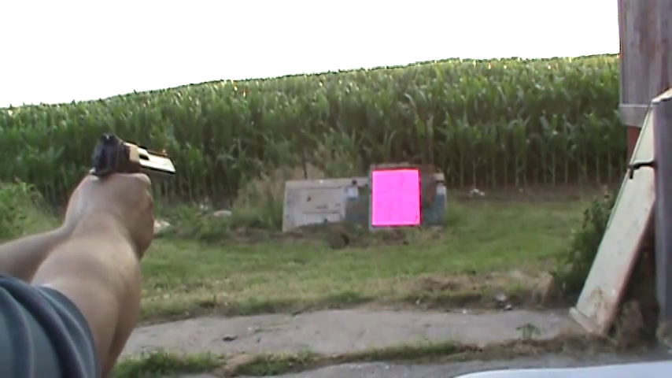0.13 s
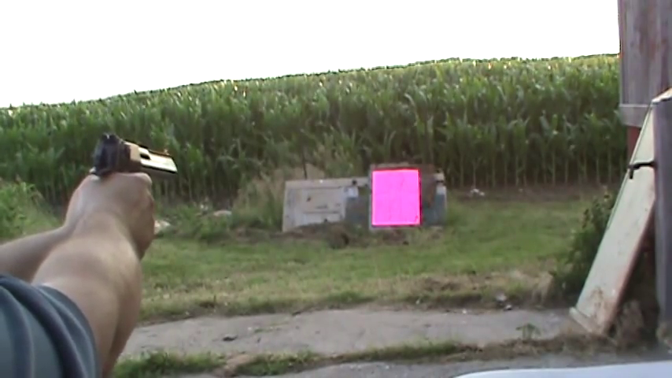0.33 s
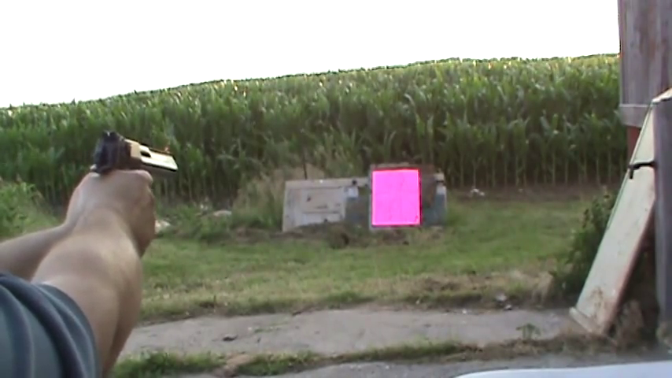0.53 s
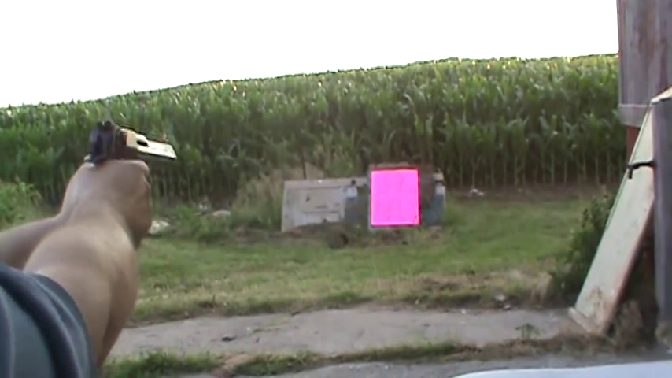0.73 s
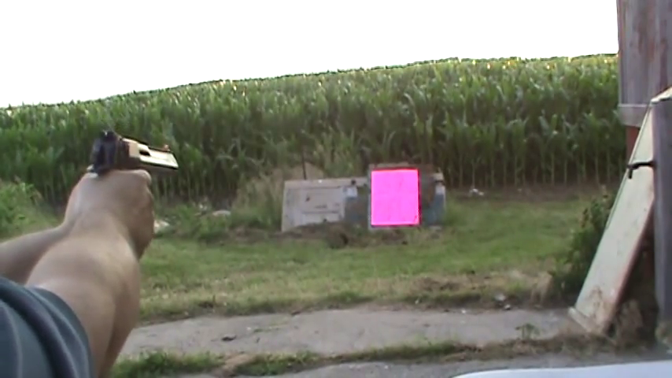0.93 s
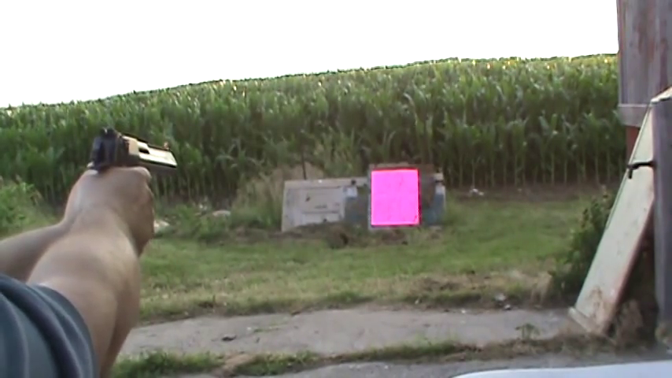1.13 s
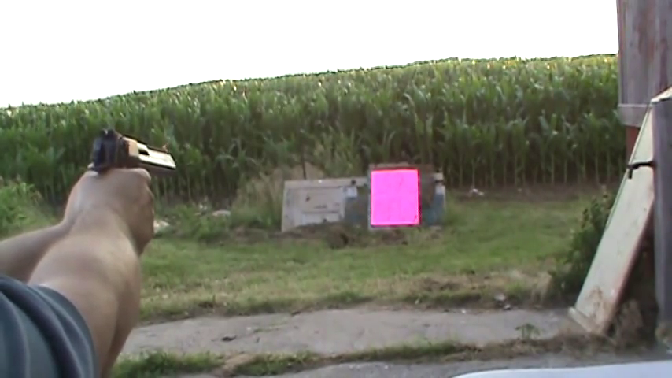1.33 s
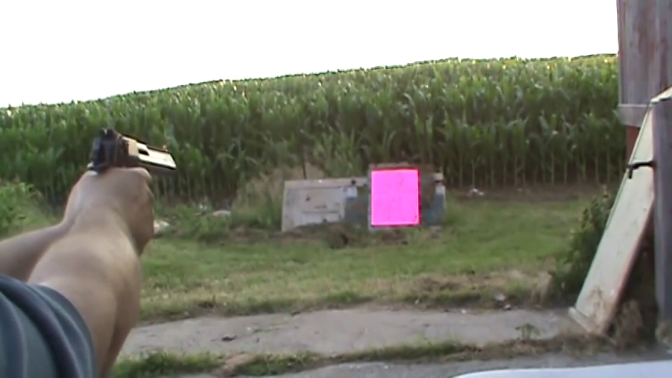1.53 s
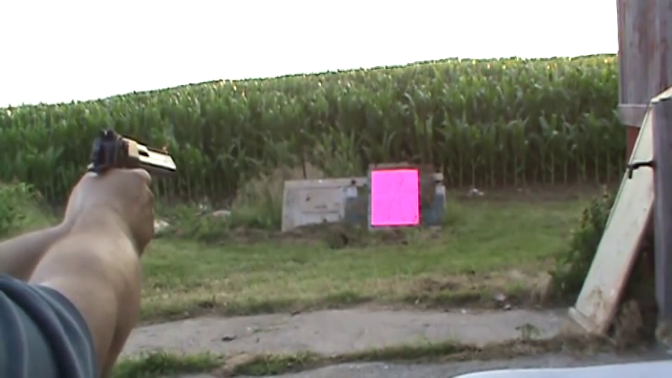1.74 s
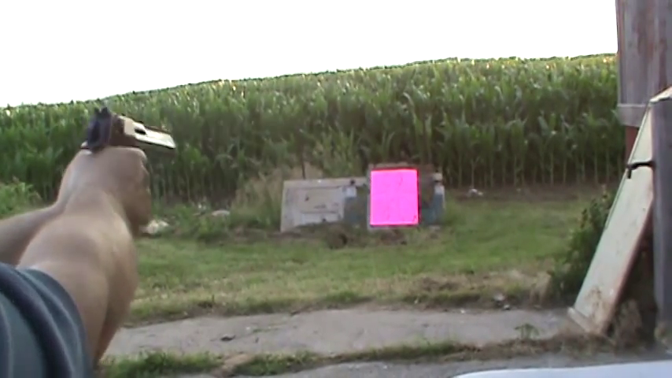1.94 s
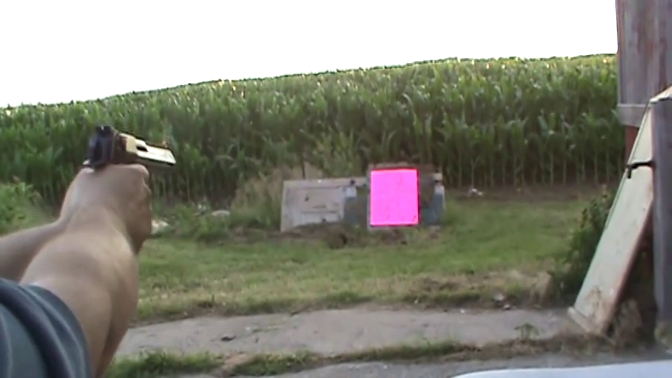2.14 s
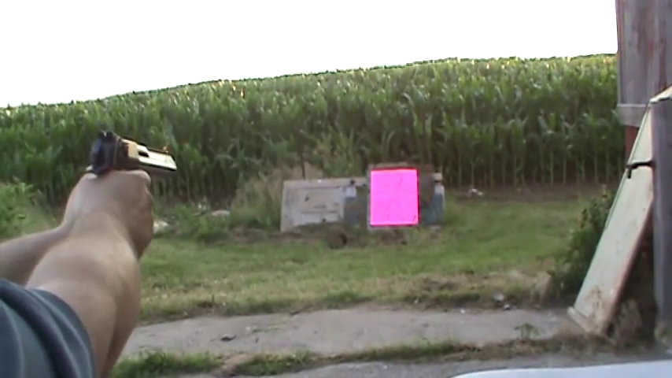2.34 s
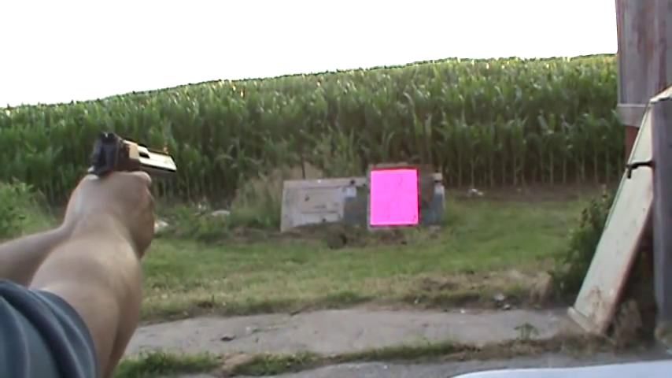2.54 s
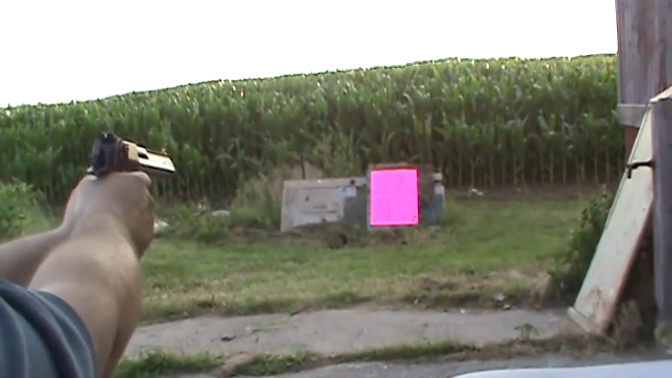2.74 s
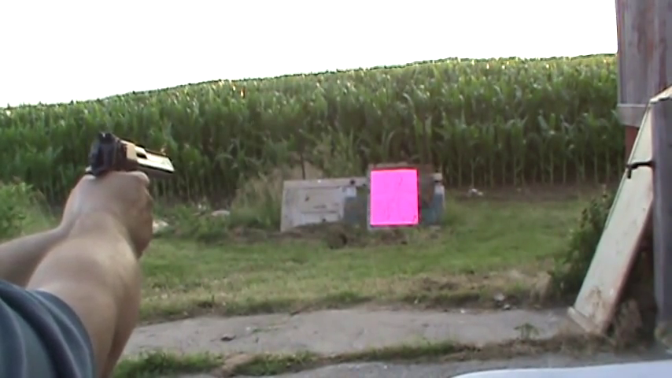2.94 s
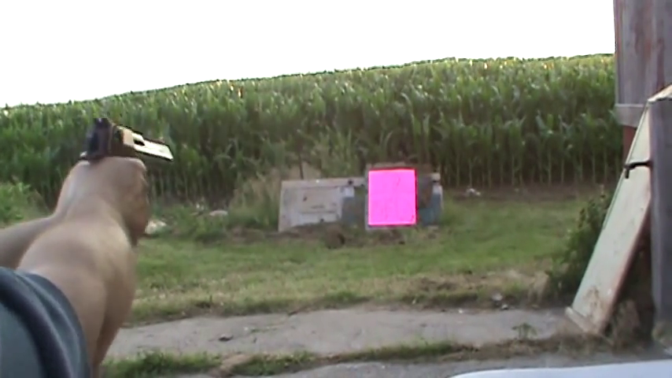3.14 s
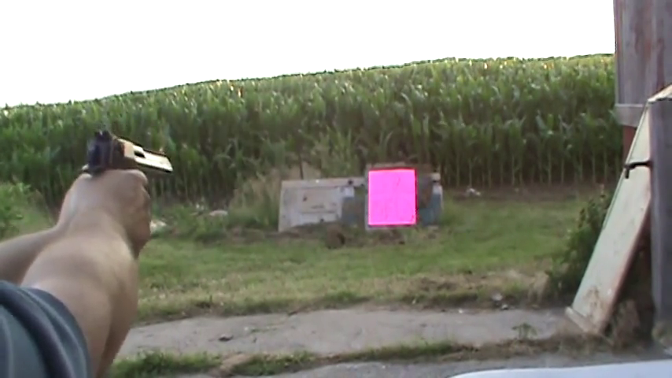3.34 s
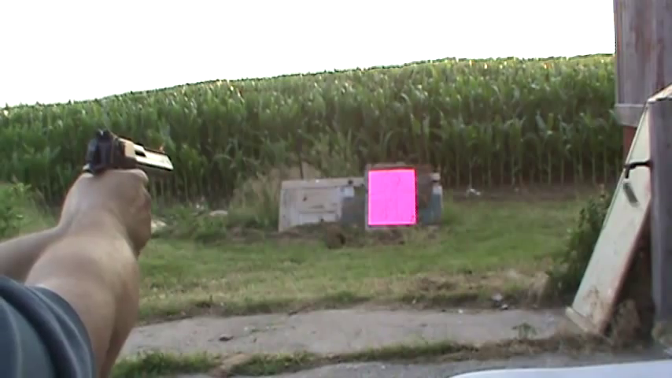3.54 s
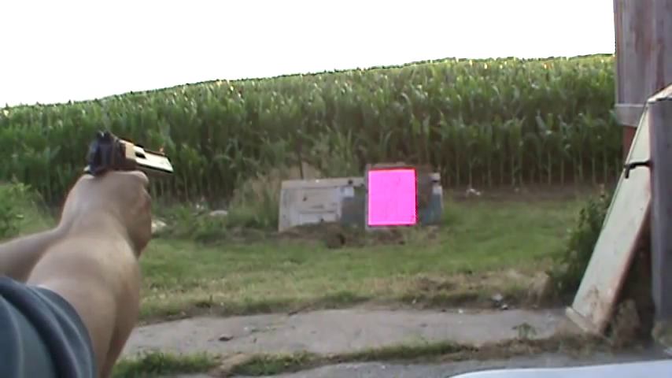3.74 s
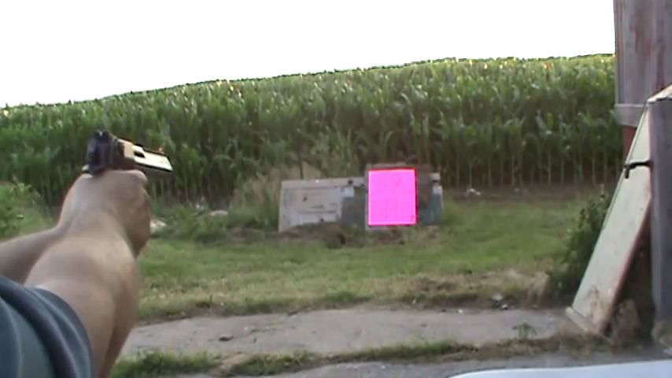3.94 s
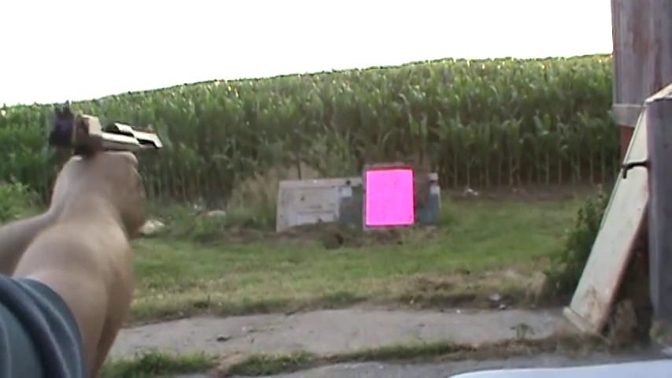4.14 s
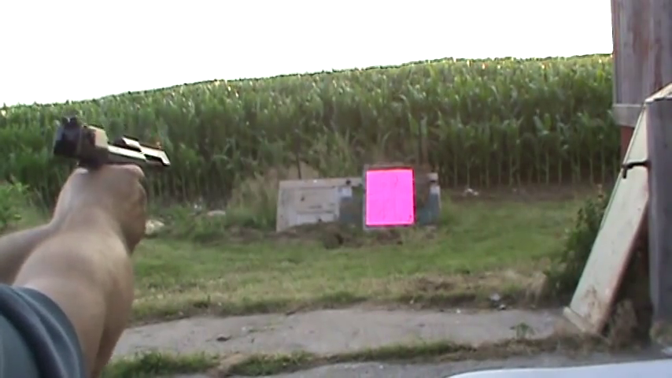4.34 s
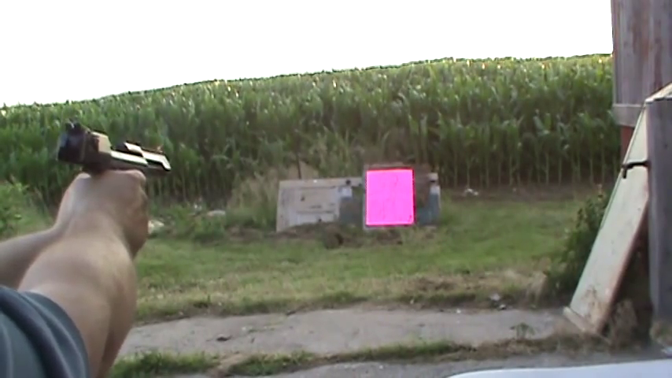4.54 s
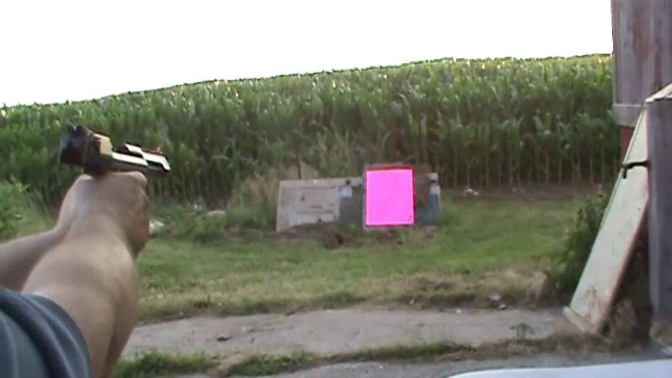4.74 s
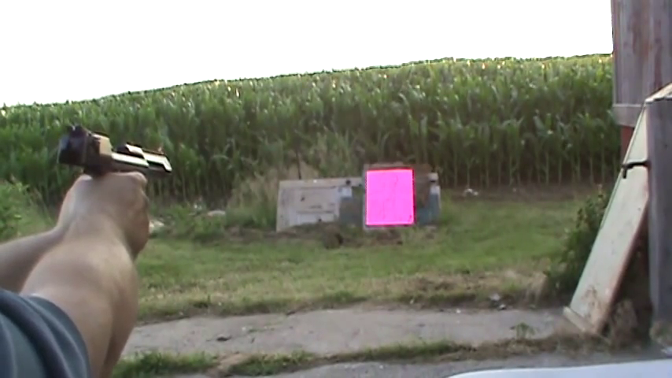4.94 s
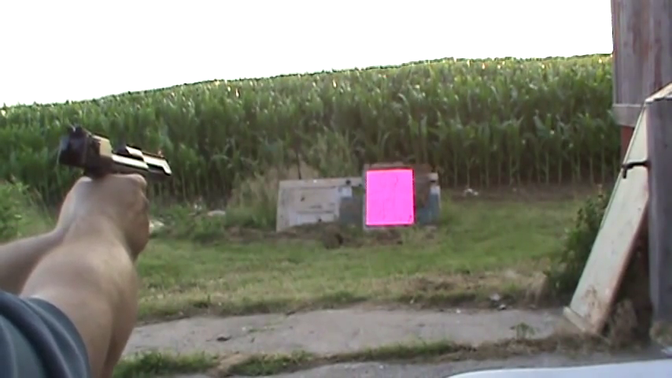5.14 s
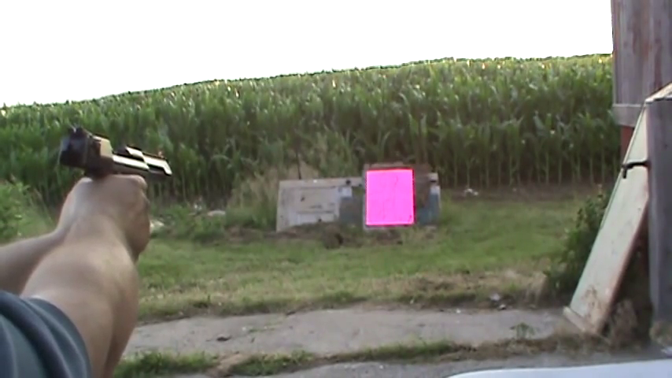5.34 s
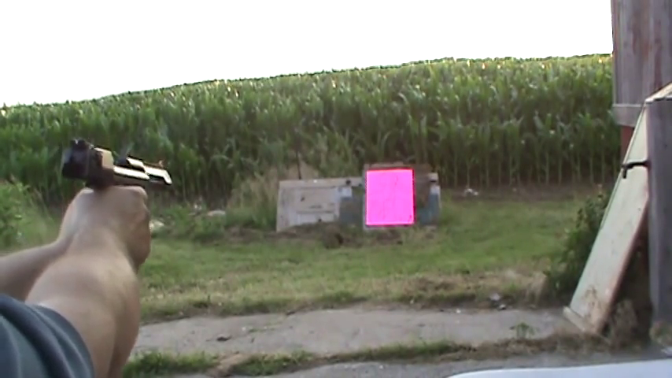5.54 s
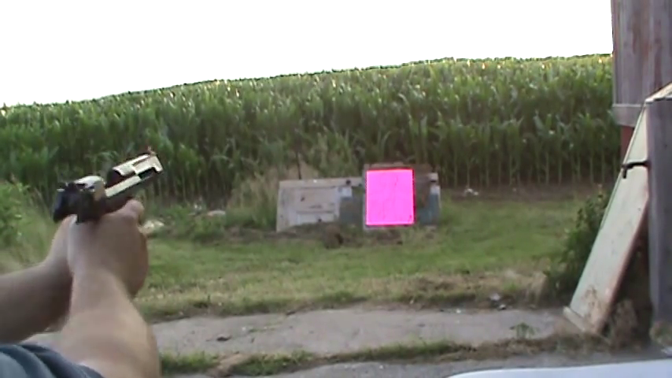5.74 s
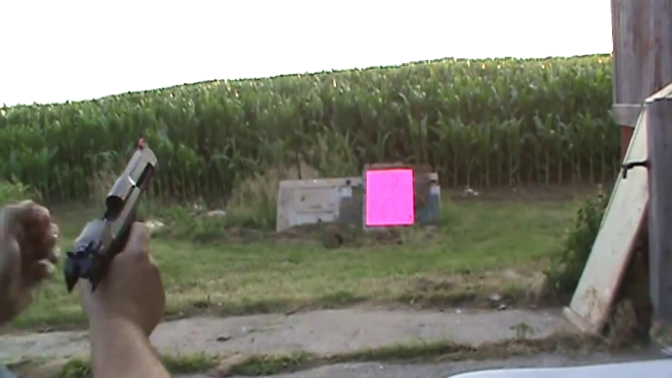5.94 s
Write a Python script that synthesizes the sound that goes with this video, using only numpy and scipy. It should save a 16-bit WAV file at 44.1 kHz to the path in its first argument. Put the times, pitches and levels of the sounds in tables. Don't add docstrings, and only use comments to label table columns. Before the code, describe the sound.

A large pistol fires four steady, overloaded shots outdoors, echoes slapping off sheds and maize, ejected cases ringing and rattling on a hard slab.

```python
import sys
import numpy as np
from scipy import signal
from scipy.fft import rfft, irfft, next_fast_len
from scipy.io import wavfile
from scipy.ndimage import uniform_filter1d, map_coordinates

SR = 44100
rng = np.random.default_rng(int(sys.argv[2]) if len(sys.argv) > 2 else 0)


def gain_from_db(level_db):
    decades = np.asarray(level_db, float) / 20
    return 10 ** decades


def transcribe(signal):
    frames = np.atleast_2d(signal).T
    limited = np.clip(frames, -1, 1)
    pcm = np.round(limited * 32767).astype(np.int16)
    wavfile.write(sys.argv[1], SR, pcm)


N = 263718


def unit(x):
    return x / np.sqrt(np.mean(x ** 2) + 1e-20)


def along(points, hz, axis=1):
    table = np.transpose(points)
    return np.interp(np.log(hz + 1), np.log(table[0] + 1), table[axis])


def wander_at(rate_hz, t, knots):
    return map_coordinates(rng.standard_normal(knots), [t * rate_hz])


def pair(size, alike):
    hz = np.fft.rfftfreq(size, 1 / SR)
    a, b = rfft(rng.standard_normal((2, size)))
    turn = np.arccos(np.clip(along(alike, hz), -1, 1)) / 2
    common, opposed = np.cos(turn) * a, np.sin(turn) * b
    return hz, np.array([common + opposed, common - opposed])


def noise_about(spectra, hz, centre_hz, octaves):
    distance = np.log2(hz / centre_hz + 1e-9) / octaves
    return unit(irfft(spectra * np.exp(-distance ** 2)))


def swell(t, rise, t60):
    late = np.maximum(t, 0)
    return gain_from_db(-60 * late / t60) * (1 - np.exp(-late / rise))


def add(out, s, sound, pan_db=0):
    start = round(s * SR) + SR
    out[:, start:start + sound.shape[-1]] += sound * gain_from_db(np.array([[.5], [-.5]]) * pan_db)


def patchy(x, depth_db):
    z = signal.stft(x, nperseg=512)[2]
    field = uniform_filter1d(rng.standard_normal(z.shape[1:]), size=8, axis=0)
    field = uniform_filter1d(field, size=9, axis=1)
    bass_share = np.linspace(1, 0, len(field))[:, None] ** 4
    return signal.istft(z * gain_from_db(depth_db * unit(field) * bass_share), nperseg=512)[1][:, :x.shape[1]]


# f/Hz, level per Hz/dB
AIR_SPECTRUM = [(20, -11), (45, -1.5), (110, -2.5), (250, -2), (500, -9), (2500, -14), (6300, -20),
                (8000, -28), (15800, -33)]
# f/Hz, likeness/1
AIR_LIKENESS = [(60, .999), (200, .975), (380, .85), (700, .6), (2400, .6), (6800, .6), (11000, .8),
                (15000, .9)]
# t/s, level/dB
BREEZE_LEVEL = [(0, 3.5), (1.599, 1), (2.799, -1), (3.9, 3.5), (5.151, 0.5), (5.501, -2), (6, 0.5)]
# t/s, level/dB
TRAFFIC_LEVEL = [(0, 0), (2.5, 1), (4.4, 0), (5, -6), (5.6, -6.5), (6, -4)]


def air():
    size, t = next_fast_len(N), np.arange(N) / SR
    hz, spectra = pair(size, AIR_LIKENESS)
    drift = wander_at(5, t, 40)
    whole = unit(irfft(spectra * gain_from_db(along(AIR_SPECTRUM, hz)), size)[:, :N])
    low = signal.sosfiltfilt(signal.butter(2, 450, fs=SR, output="sos"), whole)
    mixed = whole + low * (gain_from_db(np.interp(t, *np.transpose(TRAFFIC_LEVEL))) - 1)
    return gain_from_db(-57 + np.interp(t, *np.transpose(BREEZE_LEVEL)) + 1.7 * drift) * mixed


def rustle(out):
    per_s, level_db, spread_db, centre_hz = 16, -62, 1.8, 2000
    t = np.arange(2 ** 12) / SR
    for when, size, pitch, life, side in rng.random((round(per_s * N / SR), 5)):
        hz, spectra = pair(len(t), [(300, .3)])
        crackle = noise_about(spectra, hz, centre_hz * 4 ** (pitch - .5), 0.39)
        crackle *= swell(t, .002, .015 + 0.079 * life)
        add(out, when * N / SR, gain_from_db(level_db - spread_db * np.log(size)) * crackle, 8 * (side - .5))


# t/s, f/Hz, level/dB
CALL_GLIDE = [
    (3.751, 690, -53),
    (3.80, 700, -50),
    (3.86, 738, -52),
    (3.929, 755, -46),
    (3.965, 705, -54),
    (4.01, 650, -51),
    (4.061, 595, -54),
]


def call():
    s, hz, db = np.transpose(CALL_GLIDE)
    t = np.arange(N) / SR
    waver = wander_at(45, t, 400)
    phase = 2 * np.pi * np.cumsum(np.interp(t, s, hz)) / SR + .5 * waver
    gate = uniform_filter1d(1. * ((t > s[0]) & (t < s[-1])), 900)
    level = gain_from_db(np.interp(t, s, db) - 6.5 + 3 * waver[::-1])
    return gate * level * (np.sin(phase) + .12 * np.sin(2 * phase))


def puff(out, s, db, centre_hz, rise, t60, pan_db, octaves=1.1):
    t = np.arange(2 ** 14) / SR
    hz, spectra = pair(len(t), [(300, 0.3), (8000, 0.14)])
    add(out, s, gain_from_db(db) * noise_about(spectra, hz, centre_hz, octaves) * swell(t, rise, t60), pan_db)


# t/s, level/dB, centre f/Hz, t60/s
SCUFF_EVENTS = [(.155, -41, 1280, 0.2), (.303, -45, 7300, 0.092), (0.353, -38, 1300, 0.12),
                (0.353, -49, 5470, 0.091), (.564, -34, 716, 0.19), (1.119, -55, 9940, 0.08),
                (1.1946, -17, 1420, 0.05), (1.204, -20.5, 875, 0.1), (1.294, -33.5, 1650, 0.054),
                (1.501, -35.5, 5840, 0.075), (2.538, -39.5, 1207, 0.099), (2.601, -47.5, 890, 0.32),
                (3.533, -46, 5500, 0.3), (3.549, -39, 1050, 0.13), (3.623, -35, 600, 0.067),
                (.819, -45, 11500, 0.055), (.843, -54, 12000, .02), (.724, -46, 9000, .02),
                (3.637, -39, 5000, 0.032), (3.661, -27, 1250, 0.2), (3.664, -26, 3900, 0.12),
                (3.79, -45, 5170, 0.036), (3.802, -45, 4260, 0.051), (3.884, -54, 9500, .03),
                (4.358, -42, 8550, 0.082), (4.948, -34, 5940, 0.049), (5.327, -46.5, 1684, 0.1),
                (5.489, -41, 5110, 0.13), (5.799, -50.5, 606, 0.055), (5.922, -48, 1700, 0.26)]
# t/s, level/dB, centre f/Hz, left-right level/dB
BUMP_EVENTS = [
    (2.8915, -33, 650, -12),
]


def scuffs(out):
    for s, db, hz, t60 in SCUFF_EVENTS:
        puff(out, s, db, hz, .002, t60, -2)
    for s, db, hz, pan_db in BUMP_EVENTS:
        puff(out, s, db, hz, .002, .085, pan_db)


# t/s, level/dB, centre f/Hz
THUMP_EVENTS = [(0.12, -40, 130), (.35, -35, 355.6), (1.292, -34.5, 159.3), (2.526, -34.5, 144),
                (1.6, -33, 279), (6.9, -47, 370), (1.2, -28.5, 360), (3.684, -27.5, 245),
                (4.737, -36.5, 149), (5.488, -49, 200)]


def thumps(out):
    for s, db, hz in THUMP_EVENTS:
        puff(out, s, db, hz, .0038, .12, 0)


# t/s, level/dB, centre f/Hz
DRAG_EVENTS = [
    (.851, -24, 1810),
    (1.259, -42.5, 1230),
    (2.499, -43, 2640),
]


def drags(out):
    for s, db, hz in DRAG_EVENTS:
        puff(out, s, db, hz, .015, .36, 1.2, octaves=.45)


# t/s, level/dB
TRIGGER_EVENTS = [
    (.558, -45.5),
    (1.7935, -50.5),
    (2.978, -38),
    (4.03, -46.5),
]


def trigger(out):
    for s, db in TRIGGER_EVENTS:
        puff(out, s, db, 3300, .0003, .019, -.5)


def tone(t, hz, db, t60, turn):
    return gain_from_db(db) * swell(t, .00033, t60) * np.sin(2 * np.pi * (hz * t + turn))


# t/s, peak level/dB, upper mode level/dB, left-right level/dB
RING_EVENTS = [(.136, -58, -18, -13), (.3005, -36, -25, -6.5), (0.329, -52, -20, 1),
               (.4489, -50.5, -18, -7), (.462, -57, -8, -5), (.79, -74, 11, -4), (1.2, -63, -5.5, -6),
               (1.2214, -60, -14.5, -12), (1.497, -39.5, -11, 4), (2.168, -43, -17, -5), (2.44, -77, 4, -8),
               (2.4658, -67, -9.5, -12), (2.5714, -50.5, -7, -7), (2.6015, -47, -8, -9),
               (3.662, -70, 5, -2), (3.69, -72, 9, -2), (3.7174, -52, -20, -7), (4.3929, -50.5, -24, 3),
               (4.4588, -47, -22, -4), (4.566, -49, -24, -6), (4.7361, -58, -15, -9), (4.772, -66, -17, -6),
               (4.8194, -61, -15, -1), (4.8863, -64, -34, -10), (4.9247, -57, -32, -14),
               (4.9397, -34.5, -13, -5), (4.96, -43.5, -10, -6), (5.487, -73, 8, -6),
               (5.4959, -44, -16, -6), (5.7644, -52.5, -8.5, 6.5), (5.784, -57.5, -19, -1),
               (5.811, -53, -16, -5), (5.83, -59, -16, -1.5), (5.868, -61, -15.5, -4),
               (5.9694, -66, -13, -5)]
# f/Hz, level/dB, share of t60/1
TUBE_MODES = [(6230, 1, 0.71), (6334, 0, 0.89), (12500, -26.5, 0.51), (3104, -27, 0.41)]
# f/Hz, level/dB, share of t60/1
UPPER_MODES = [(15400, -4.5, 1.1), (15530, -3, 1.05)]
CASE_START = [0, 1, 2, 3.5, 4.2, 4.93, 5.2]
# f/Hz, t60/s
CASE_PITCH = [(6250, 0.23), (6220, 0.22), (6230, 0.24), (6360, 0.11), (6360, 0.31), (6245, 0.18),
              (6300, 0.22)]


def rings(out):
    t = np.arange(SR // 3) / SR
    tube_hz = TUBE_MODES[0][0]
    for (s, db, upper_db, pan_db), turns in zip(RING_EVENTS, rng.random((len(RING_EVENTS), 8))):
        hz, t60 = CASE_PITCH[np.searchsorted(CASE_START, s) - 1]
        splits = [1, 0.3 + .35 * turns[6], 1, 1]
        uneven_db = 2.6 + 6 * turns[7]
        wander, flutter = wander_at(90, t, 40), wander_at(90, t, 40)
        turns = turns[:, None] + .5 * wander / (2 * np.pi)
        ring = 0
        for (mode_hz, level_db, share), turn, split in zip(TUBE_MODES, turns, splits):
            case_hz = hz + (mode_hz * hz / tube_hz - hz) * split
            ring = ring + tone(t, case_hz, level_db - uneven_db * (mode_hz > tube_hz), share * t60, turn)
        for (mode_hz, level_db, share), turn in zip(UPPER_MODES, 2 * turns[4:]):
            ring = ring + tone(t, mode_hz, level_db + upper_db, share * t60, turn)
        add(out, s, gain_from_db(db + 6.0 + 4.3 * flutter) * ring, pan_db)


# t/s, level/dB, f/Hz,
# t60/s
TAP_EVENTS = [(0.851, -29, 2053, 0.09), (0.855, -31.5, 1570, 0.16), (0.884, -25, 1543, 0.092),
              (.892, -29.5, 2100, 0.13), (0.921, -29.5, 1570, 0.15), (2.808, -52.5, 1063, 0.1),
              (3.786, -38.5, 974, 0.08), (3.89, -51.5, 1134, 0.26), (3.906, -48, 983, 0.084),
              (3.96, -56, 1047, 0.58), (4.393, -16.5, 3230, 0.017), (1.574, -59, 1090, 0.16),
              (2.68, -57, 1470, 0.13), (2.553, -46, 2760, .04), (4.7473, -26, 3300, 0.028),
              (5.633, -41, 5190, 0.017), (5.696, -56, 1128, 0.12), (5.868, -57, 1570, 0.14),
              (5.921, -45.5, 1580, 0.074), (5.925, -53.5, 1930, 0.1)]


def taps(out):
    t = np.arange(SR // 3) / SR
    for s, db, hz, t60 in TAP_EVENTS:
        add(out, s, tone(t, hz, db + 2.5, t60, 0) * (1 - np.exp(-t / 0.00091)))


def knock(out, s, db, thud_db, bright_db, pan_db, body_hz, t60, modes, touch=.55, smear=.15, grit=.36):
    t = np.arange(2 ** 12) / SR
    hz, spectra = pair(len(t), [(300, 0.45), (8000, 0.3)])
    body_hz = body_hz * (1 + 0.016 * rng.standard_normal())
    first_touch = touch * swell(t, .0002, .008)

    def mode(ratio):
        return np.sin(2 * np.pi * body_hz * ratio * t)

    def grain(octaves):
        return noise_about(spectra, hz, body_hz, octaves)

    def crack(centre_hz, octaves, smear_t60):
        return noise_about(spectra, hz, centre_hz, octaves) * (first_touch + smear * swell(t, 0.0031, smear_t60))

    body = 0.51 * modes(mode, grain) * swell(t, 0.00031, t60) + grit * crack(3300, 0.83, 0.07)
    edge = gain_from_db(bright_db) * crack(7800, .55, 0.026)
    thud = gain_from_db(thud_db) * crack(1030, 1.75, 0.1)
    add(out, s, gain_from_db(db) * (body + edge + thud), pan_db)


# t/s, peak level/dB, thud level/dB, left-right level/dB
CLINK_EVENTS = [(0.301, -21, -3, -4), (.3191, -37, -4, -3), (0.451, -37.5, 5, -2), (.482, -37.5, -7, -7),
                (1.4965, -22, -8, -2), (1.512, -28.5, -8, -2.5), (2.0922, -25, -3, 5), (2.132, -29, 9, 2),
                (2.2045, -27.5, -3, 4), (2.307, -31.5, -14, -3), (2.368, -43, -9, -3), (2.5728, -34, 1, -4),
                (2.5978, -37.5, 10.5, 2), (2.6006, -33, 0, -8), (3.2603, -24.5, 0, 4),
                (3.7844, -37.5, 6, -8), (4.4645, -20, -5, -7), (4.7474, -23.5, -28.5, -18),
                (5.487, -18, -13.5, -1.5), (5.5041, -34, -11, -1), (5.7636, -32.5, -8, -4),
                (5.7779, -34, -8, 1), (5.83, -40, -17, 3.5), (5.91, -40, -2.5, -2), (5.915, -31, -6.5, 3),
                (5.919, -29.5, -22, -4), (5.974, -42, -11, -4), (5.927, -34, -32, -2)]


def clinks(out):
    def modes(mode, grain):
        return 0.32 * mode(0.94) + 0.64 * mode(0.97) + 0.27 * grain(0.08)
    for s, db, thud_db, pan_db in CLINK_EVENTS:
        knock(out, s, db, thud_db, -14, pan_db, 3230, .038, modes)


# ratio to the body f/1, level/dB
BODY_OVERTONES = [(0.471, -9), (1.55, -6.5), (2.45, -12.5), (2.87, -13)]


def flat_modes(mode, grain):
    return mode(0.99) + sum(gain_from_db(level_db) * mode(ratio) for ratio, level_db in BODY_OVERTONES)


# t/s, peak level/dB, bright level/dB, left-right level/dB
CLACK_EVENTS = [(1.1951, -19, -16, -12), (2.8898, -30.5, -10, -5.5), (4.3934, -20.5, -42, -15),
                (4.4573, -15, -42, -10.5), (4.7359, -18, -19, -5), (4.821, -23, -36, -5),
                (4.873, -26, -25, -4), (4.9252, -36, -22, -4), (4.9399, -27.5, -10, -4)]


def clacks(out):
    for s, db, bright_db, pan_db in CLACK_EVENTS:
        knock(out, s, db, -1, bright_db, pan_db, 1820, .016, flat_modes)


# t/s, peak level/dB
RATTLE_EVENTS = [(4.5463, -35), (4.555, -18), (4.5658, -21.5), (4.5742, -26), (4.6172, -24.5),
                 (4.6368, -30), (4.651, -35), (4.768, -23.5), (4.7866, -29), (4.8396, -30), (4.9048, -32.5)]


def rattle(out):
    for s, db in RATTLE_EVENTS:
        knock(out, s, db, -3, -58, -6, 1930, .016, flat_modes)


# t/s, peak level/dB, body f/Hz, bright level/dB, left-right level/dB
SNAP_EVENTS = [(0.1269, -1.5, 3140, -17, -6.5), (0.1289, -17.5, 5880, -2.5, -12),
               (.1305, -26, 900, -20, -1), (.159, -28, 1490, -25, 4), (.163, -28, 2980, -27, 1),
               (1.2032, -14, 1450, -28, -13), (1.2115, -31, 1300, -15, -6), (1.23, -36, 4000, -12, -2),
               (3.655, -6.5, 2660, -29, -14), (2.614, -33, 3170, 5.5, -1), (3.6588, 1.5, 1710, -13.5, -3.5),
               (3.6586, -4, 3900, -12.5, -2.5), (3.6586, -7, 5810, -12, -2.5),
               (3.661, -3.5, 1750, -28, -12), (3.675, -13, 4870, -26.5, -5), (3.683, -16, 980, -20, -10),
               (3.711, -28, 2400, -30, -4), (5.3619, -29.5, 3020, 2.5, 0), (5.3625, -28, 5700, -18, -2.5),
               (5.633, -29.5, 2875, -21, -1)]


def snaps(out):
    def modes(mode, grain):
        return 1.1 * mode(1) + 0.2 * grain(.2)
    for s, db, hz, bright_db, pan_db in SNAP_EVENTS:
        knock(out, s, db, -12, bright_db, pan_db, hz, .0075, modes, touch=.45, smear=.088, grit=.17)


# f/Hz, left-right level/dB
BLAST_LEAN = [(60, 3.5), (150, 0.5), (380, 1), (950, -4), (2380, -1.5), (5980, -1.5), (15000, -0.5)]


def banded(size, envelope, alike):
    bands = np.geomspace(25, 17000, 30)
    hz, spectra = pair(size, alike)
    spectra = spectra * gain_from_db(np.outer([.5, -.5], along(BLAST_LEAN, hz)))
    place, out = np.interp(hz, bands, np.arange(len(bands))), np.zeros((2, size))
    for k, centre_hz in enumerate(bands):
        level = envelope(centre_hz)
        if level.max() > 1e-4:
            band = irfft(spectra * np.clip(1 - abs(place - k), 0, 1), size)
            out += band / np.sqrt(np.mean(band ** 2)) * level
    return out / np.sqrt(len(bands))


# f/Hz, likeness/1
ECHO_LIKENESS = [(60, .5), (150, 1), (300, 0.9), (480, 0.27), (1400, 0.45), (3000, 0.45), (7000, 0.31),
                 (11000, 0.57), (15000, 0.64)]


def answers(surfaces, rise, size, alike=ECHO_LIKENESS):
    t, steepness = np.arange(size) / SR, 8.03
    s, db, lo, hi, t60 = np.transpose(surfaces)
    rise = np.broadcast_to(rise, s.shape)
    power = (gain_from_db(db)[:, None] * swell(t - s[:, None], rise[:, None], t60[:, None])) ** 2

    def envelope(hz):
        passed = 1 / (1 + (lo / hz) ** steepness) / (1 + (hz / hi) ** steepness)
        return np.sqrt(passed @ power)
    return banded(size, envelope, alike)


# delay t/s, f/Hz, level/dB, t60/s
SHED_MODES = [(.27, 227.4, -27, 0.8)]
# delay t/s, f/Hz, level/dB, t60/s
PANEL_MODES = [(0.003, 825.5, -7.5, 0.13), (0.003, 874.6, -7.5, 0.13), (0.004, 571.0, -5, 0.13),
               (0.009, 388.0, 1.3, 0.12), (0.012, 1332, 0, 0.08), (0.014, 1052, -0.0, 0.08),
               (0.014, 1176, -2, 0.08), (0.021, 306.5, 2, 0.08), (0.024, 1479, -4.5, 0.086),
               (0.026, 486, 2.4, 0.09), (0.026, 781.0, -4.5, 0.09), (0.031, 167.3, -5.5, 0.08),
               (0.031, 882.4, -2, 0.09), (0.041, 1100, -9, 0.08), (0.046, 956, -5.5, 0.1),
               (0.061, 394.6, -8, 0.08), (0.079, 230, -7, 0.14), (0.081, 804, -12, 0.08),
               (0.084, 634.6, -11.5, 0.13), (0.106, 290.7, -14, 0.13), (0.109, 404.0, -8, 0.093),
               (0.111, 1015, -11.5, 0.13), (0.114, 665, -16.5, 0.09), (0.124, 831, -11.5, 0.08),
               (0.127, 1090, -7.5, 0.08), (0.131, 250.7, -7, 0.08), (0.141, 441.0, -11.5, 0.095),
               (0.141, 1023.0, -7, 0.097), (0.15, 227.6, -12.0, 0.46), (0.154, 956, -14, 0.13),
               (0.159, 754.0, -13.5, 0.09), (0.161, 334.0, -12.5, 0.13), (0.174, 640.7, -10.5, 0.17),
               (0.186, 361.0, -12, 0.08), (0.199, 447.0, -19.5, 0.13), (0.201, 576.0, -14, 0.15),
               (0.204, 716, -12, 0.09), (0.206, 226.0, -9, 0.26), (0.225, 442, -26, 0.09),
               (0.228, 309, -18, 0.091), (0.231, 633, -18, 0.13), (0.25, 875, -26, 0.1),
               (0.261, 640, -17, 0.08), (0.276, 339.0, -23, 0.09), (0.289, 168.5, -17, 0.08),
               (0.3, 646, -26, 0.1), (0.303, 388.0, -25, 0.098), (0.308, 244, -19, 0.11),
               (0.33, 480.0, -24.5, 0.12), (0.356, 216, -23.5, 0.096)]


def panels():
    t = np.arange(2 ** 16) / SR
    left_lead = np.array([[.3], [-.3]])
    wander = .8 * wander_at(25, t, 60)
    boom = 0
    for s, hz, db, t60 in SHED_MODES:
        boom = boom + gain_from_db(db) * swell(t - s, 0.0022, t60) * np.sin(2 * np.pi * hz * t + left_lead + wander)
    boom = boom * gain_from_db([[.9], [-.9]])
    for s, hz, db, t60 in PANEL_MODES:
        side = np.array([[-1], [1]]) * min(hz / 400, 1)
        vibration = np.sin(2 * np.pi * hz * (t - s) + .6 * side)
        boom = boom + gain_from_db(db - 1 + 1.5 * side) * swell(t - s, .004, t60) * vibration
    return boom


# delay t/s, level/dB, low edge f/Hz, high edge f/Hz, t60/s
WALL_ECHOES = [(0.00082, 1, 260, 1236, 0.43), (0.038, -2.5, 281, 560, 0.21), (0.022, -13, 130, 320, 1),
               (0.039, 1, 808, 1600, 0.36), (.058, -1.5, 1882, 5130, 0.22),
               (0.098, -17.5, 1600, 5580, 0.77), (.11, -20.5, 602, 1153, 0.44),
               (0.11, -6.5, 460, 1600, 0.38), (0.12, -10.5, 210, 854, 0.72), (0.19, -13, 170, 1320, 0.67),
               (0.333, -30.5, 114, 5800, 0.38), (.058, -17, 7100, 14000, 0.26),
               (.05, -7.5, 1700, 1900, .16), (0.256, -22, 300, 1050, .55)]
# delay t/s, level/dB, low edge f/Hz, high edge f/Hz, t60/s
FIELD_ECHOES = [(.093, -51, 168, 15400, .32), (.313, -40, 118.8, 3320, 0.93),
                (.35, -47.5, 50.1, 202.4, 4.1), (.36, -30, 300, 1010, .48)]
# delay t/s, level/dB, low edge f/Hz, high edge f/Hz, t60/s
PRESSURE_WAVE = [(0, -14, 70.1, 201, 0.22), (0, -19.5, 21.6, 665.5, 0.49)]
# f/Hz, likeness/1
PRESSURE_LIKENESS = [(30, 0.03), (90, .05), (150, 1)]
BLAST_RISE_S = 0.00027


def yard():
    echoes = panels()
    rises = [.0068] * len(WALL_ECHOES) + [.11] * len(FIELD_ECHOES)
    echoes += patchy(answers(WALL_ECHOES + FIELD_ECHOES, rises, 2 ** 16), 2.5)
    echoes[:, :2 ** 15] += answers(PRESSURE_WAVE, BLAST_RISE_S, 2 ** 15, PRESSURE_LIKENESS)
    return echoes


# t/s, level/dB
SHOT_EVENTS = [
    (.5983, 0),
    (1.8426, 0),
    (3.0130, 0),
    (4.0684, 0),
]
# delay t/s, level/dB, low edge f/Hz,
# high edge f/Hz, t60/s
MUZZLE_GAS = [(0, -2, 8140, 12800, 0.2), (0, -5, 13000, 16010, .1), (0, 4.5, 1870, 6574, 0.24),
              (.005, 1.5, 597.5, 1398, 0.22), (.043, -5.5, 2000, 9000, 0.026),
              (0.049, -10.5, 300, 1200, .55), (0, -3, 1800, 2600, .12)]


def shots(out):
    echoes, ahead = yard(), np.arange(-400, 0) / SR
    lead_in = gain_from_db(-13.0) * np.exp(ahead / 0.00014) + gain_from_db(-35) * np.exp(ahead / .005)
    for s, db in SHOT_EVENTS + [(-0.5, 0)]:
        gas = gain_from_db(db) * answers(MUZZLE_GAS, BLAST_RISE_S, 2 ** 14)
        add(out, s + ahead[0], lead_in * gas[:, 100:][:, :len(ahead)])
        add(out, s, gas)
        add(out, s, gain_from_db(db) * echoes)


def scene():
    out = np.zeros((2, N + 3 * SR))
    for source in (rustle, scuffs, thumps, drags, trigger, rings, taps, clinks, clacks, rattle, snaps, shots):
        source(out)
    return out[:, SR:SR + N] + call() + patchy(air(), 2.5)


def roll_off(x):
    return signal.sosfilt(signal.butter(12, 16300, fs=SR, output="sos"), x)


def record(dry):
    t = np.arange(N) / SR
    lag_s, kept_db, depth_db, recovery_s = 0.072, 2.1, 7.06, 0.19
    duck_db = np.zeros(N)
    for s, _ in SHOT_EVENTS:
        since = t - s
        kept = kept_db * np.clip((lag_s - since) / 0.085, 0, 1)
        duck_db += (since >= 0) * (depth_db * np.clip(1 - since / recovery_s, 0, 1) - kept)
    x = signal.sosfilt(signal.ellip(8, .5, 50, 15750, fs=SR, output="sos"), dry) * gain_from_db(-duck_db)

    def soft(v, top):
        return v / (1 + abs(v / top) ** 5) ** (1 / 5)
    mid, side = soft((x[0] + x[1]) / 2, .95), soft((x[0] - x[1]) / 2, .8)
    x = signal.sosfilt(signal.butter(1, 30, "high", fs=SR, output="sos"), [mid + side, mid - side])
    x = 1.04 * x / (1 + abs(x) ** 10) ** (1 / 10)
    return roll_off(x)


dry = scene()
out = record(dry)
transcribe(out)
```